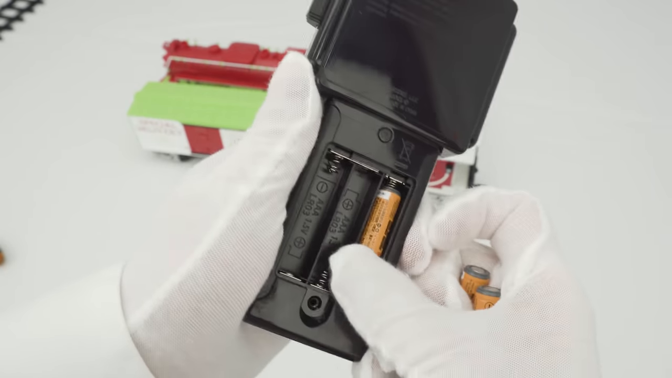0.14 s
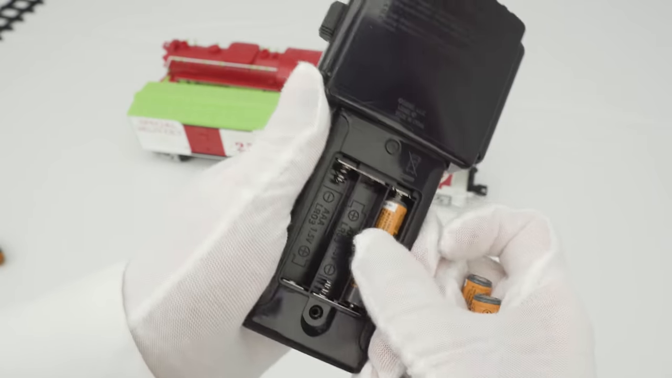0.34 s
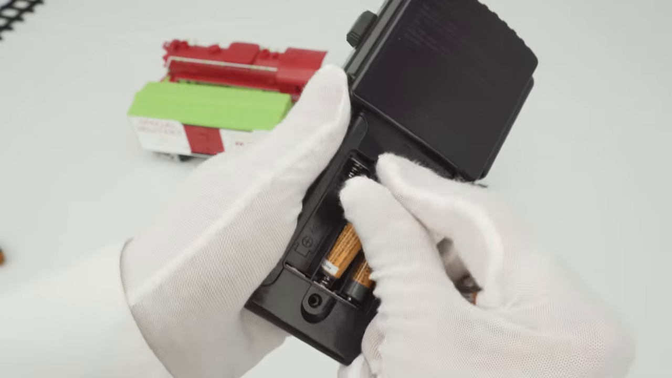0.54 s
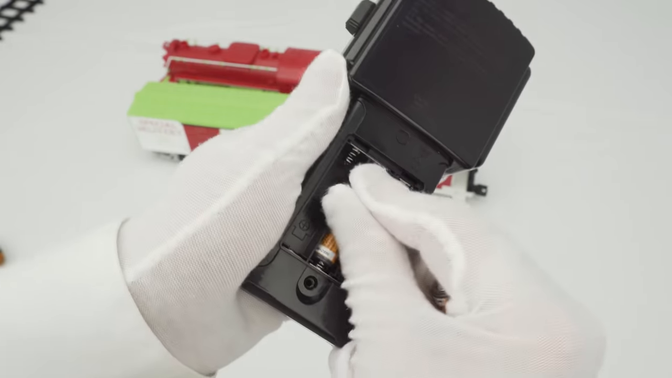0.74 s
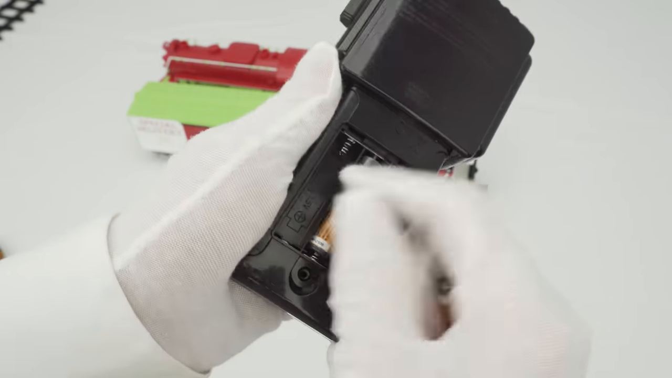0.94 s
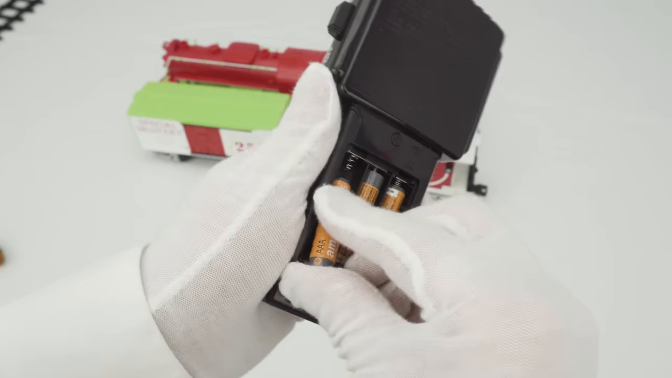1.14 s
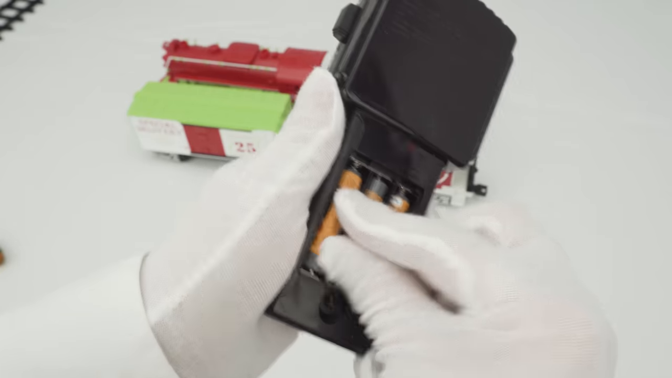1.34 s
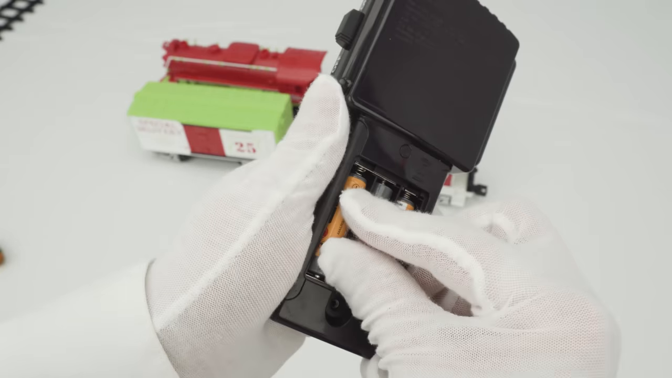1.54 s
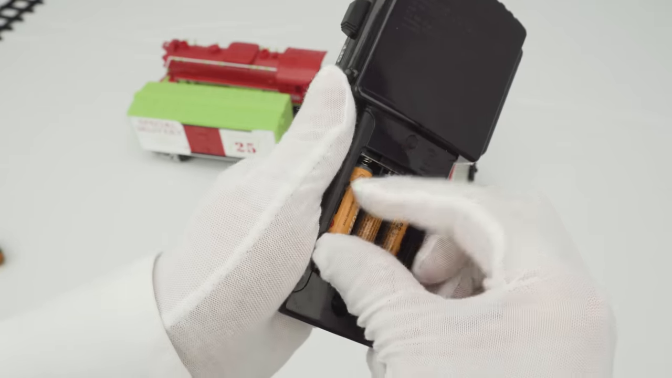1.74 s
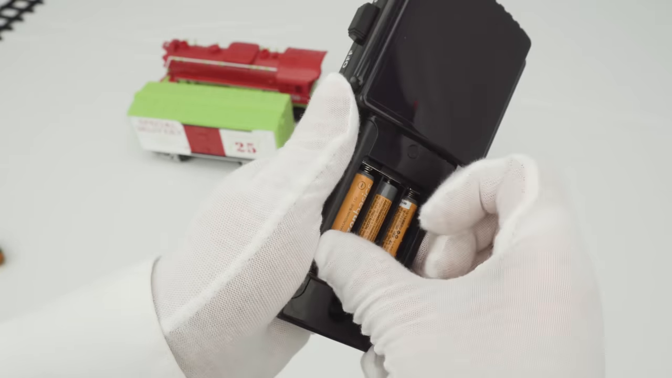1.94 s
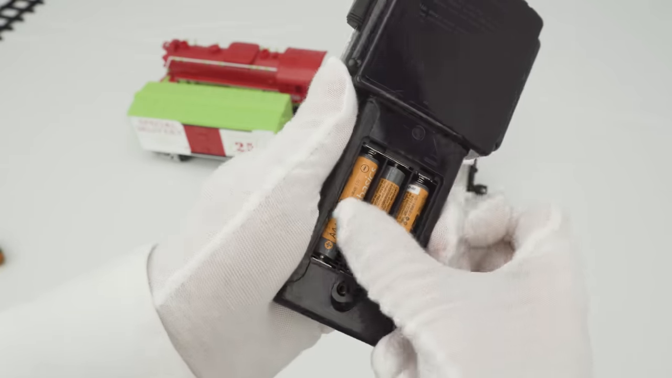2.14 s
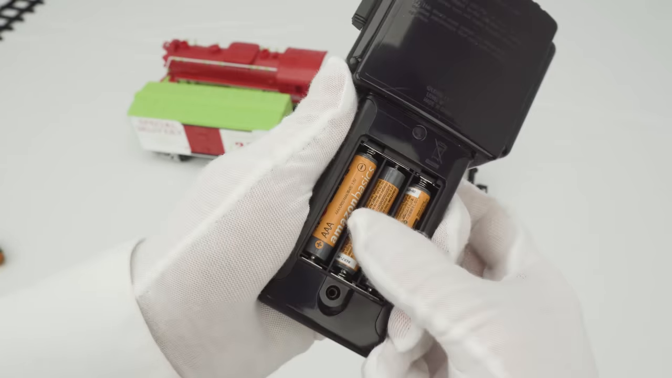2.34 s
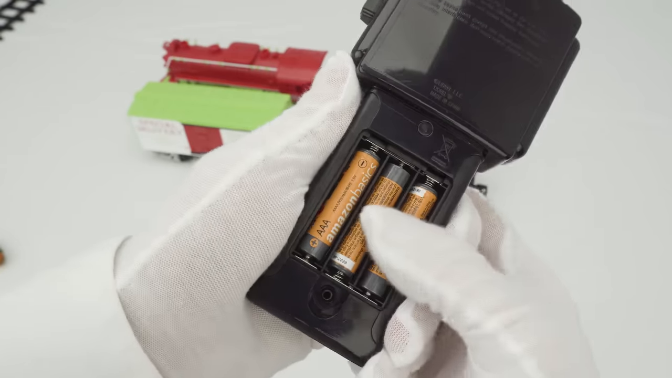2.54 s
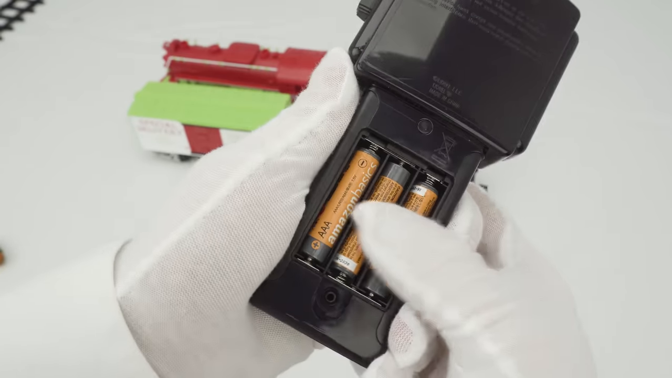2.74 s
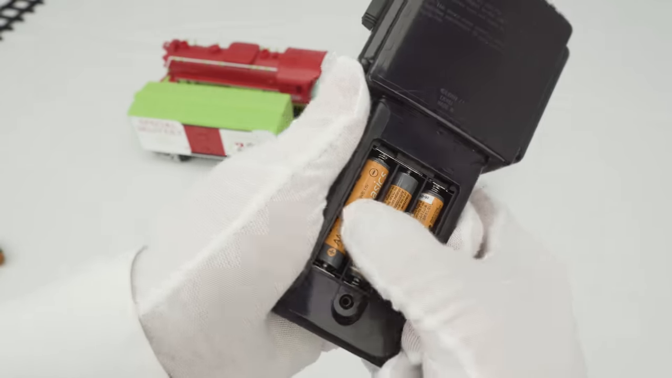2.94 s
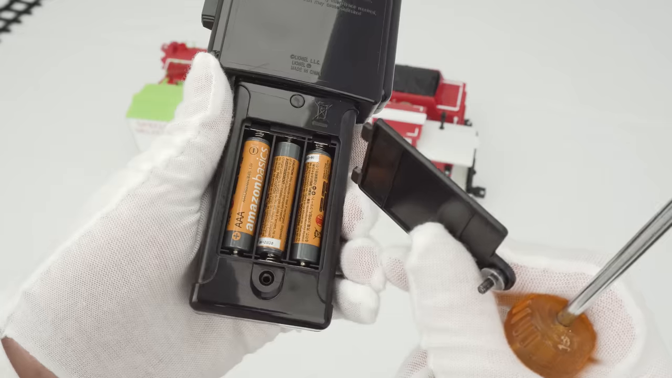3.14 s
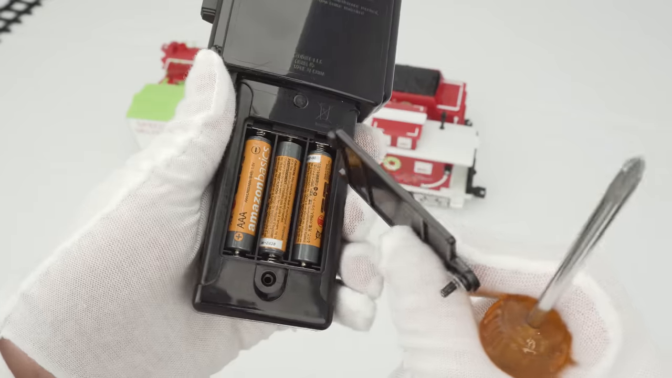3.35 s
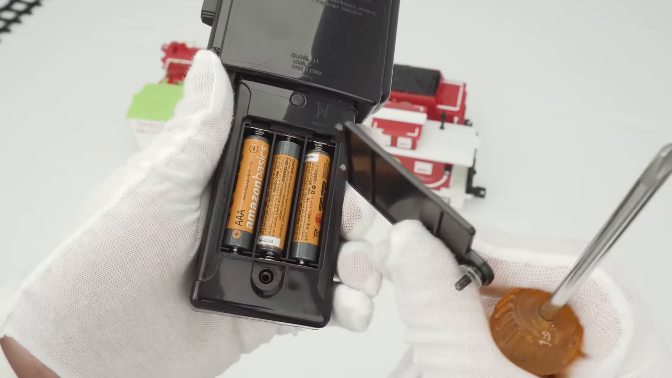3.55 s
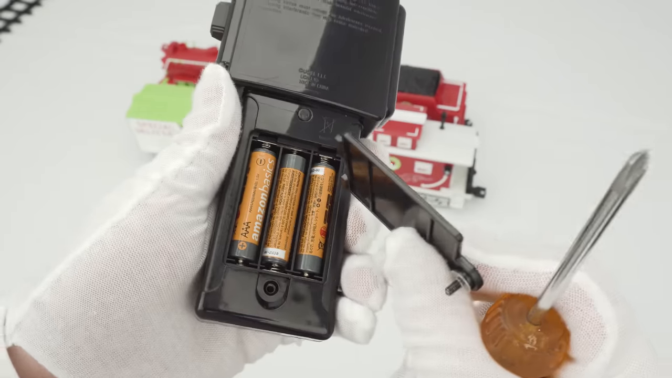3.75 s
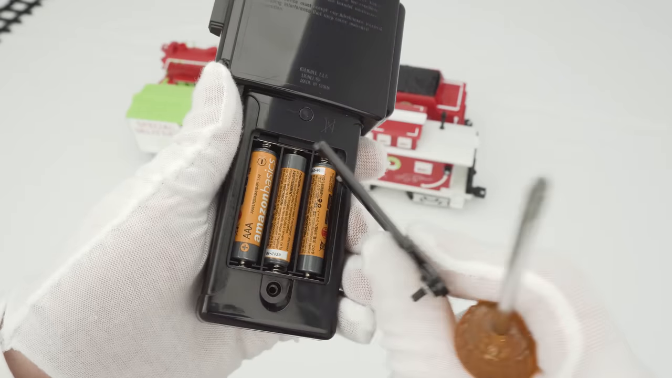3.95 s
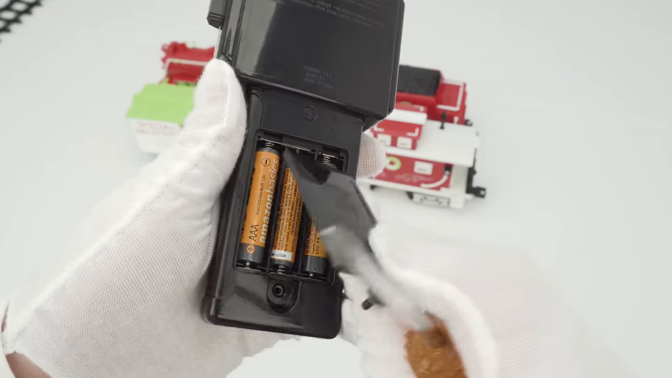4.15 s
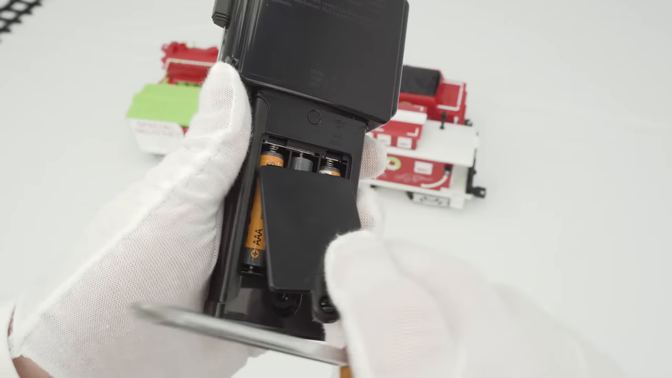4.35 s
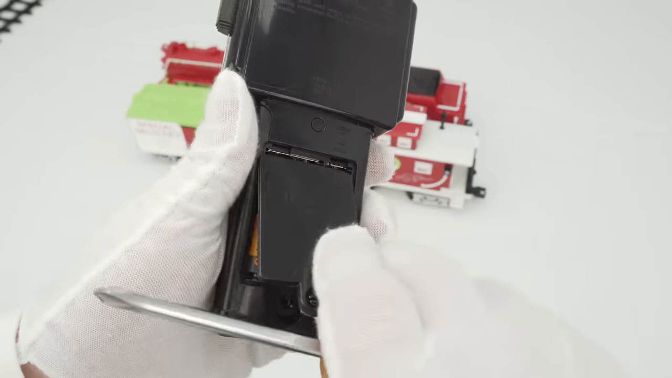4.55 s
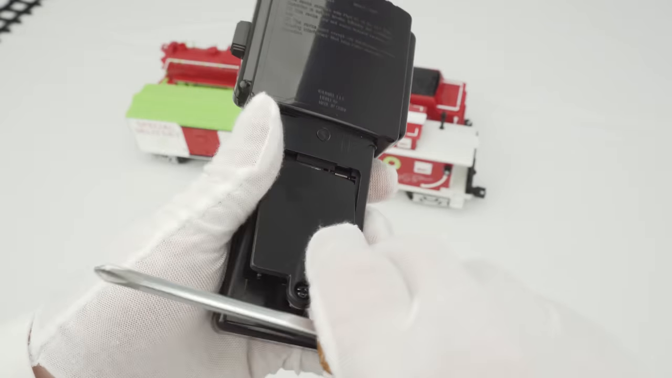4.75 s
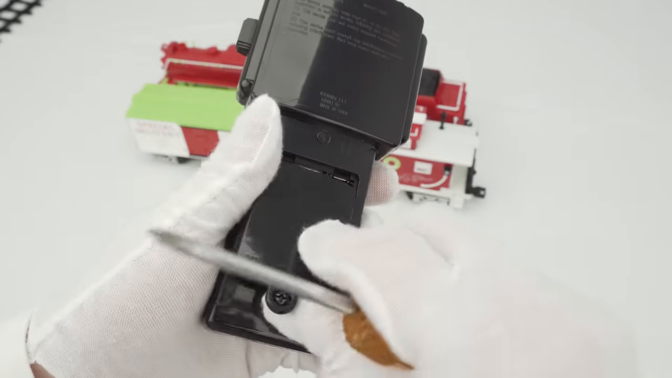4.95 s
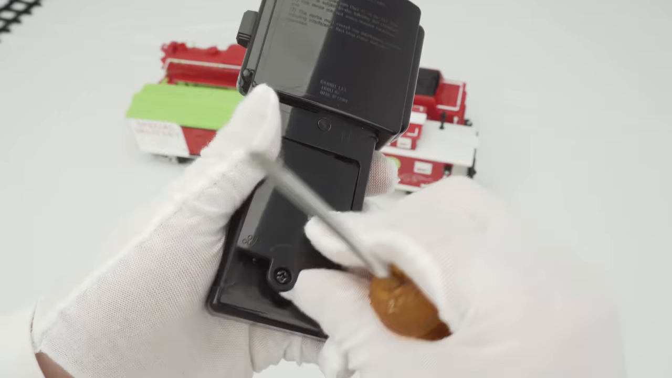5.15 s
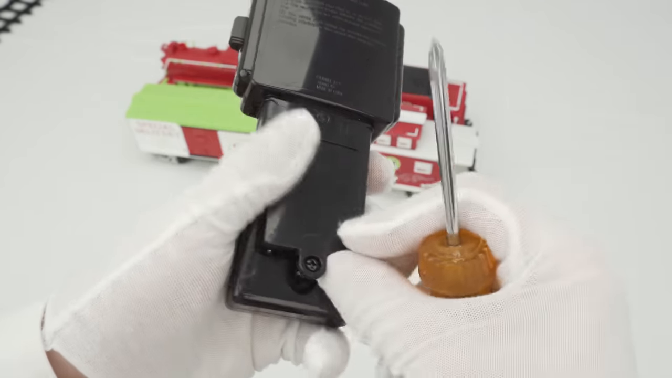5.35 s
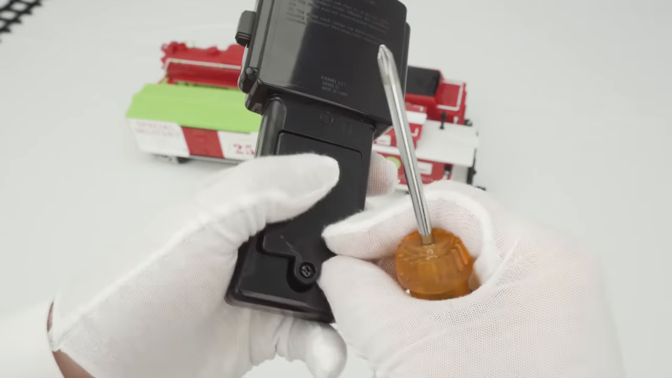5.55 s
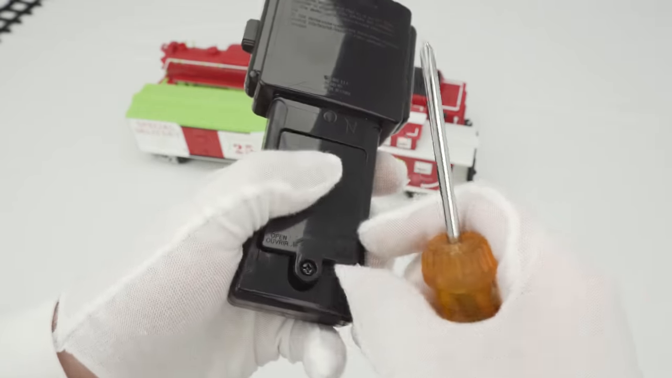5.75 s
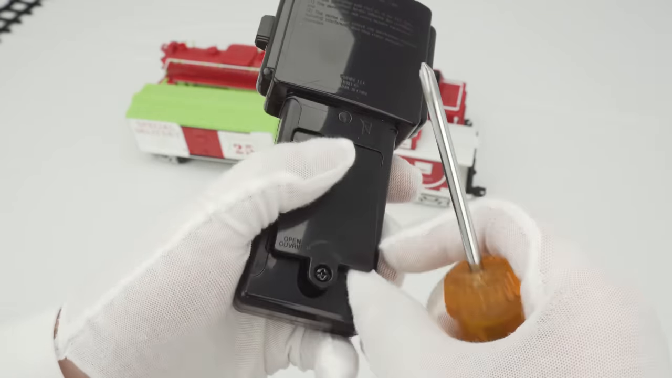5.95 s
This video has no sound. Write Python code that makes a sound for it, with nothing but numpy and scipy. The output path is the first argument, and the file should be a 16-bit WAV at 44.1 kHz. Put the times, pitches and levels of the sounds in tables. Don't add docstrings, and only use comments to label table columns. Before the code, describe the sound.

A camera microphone very near the hands catches a brief glove rub, then hard plastic and spring snaps as three battery cells are seated, each with a short room reflection. Cells are rolled with gritty cotton rubs and tiny ticks. Later a cover scrapes lightly, clicks shut with two firm snaps, and is stroked. Faint traffic rumble and a fluctuating hiss lie behind.

```python
import sys
import numpy as np
from scipy import signal
from scipy.fft import rfft, irfft, next_fast_len
from scipy.io import wavfile
from scipy.ndimage import map_coordinates

SR = 44100
rng = np.random.default_rng(int(sys.argv[2]) if len(sys.argv) > 2 else 0)


def how_loud(loudness_db):
    steps = np.asarray(loudness_db, float) / 20
    return 10 ** steps


def pcm_store(signal):
    levels = np.round(np.clip(np.atleast_2d(signal), -1, 1) * 32767)
    wavfile.write(sys.argv[1], SR, levels.astype(np.int16).T)


N = 264600
STEADY_TOP_HZ = 15950


def unit(x):
    return x / np.sqrt(np.mean(x ** 2) + 1e-20)


def top(x):
    return x / np.abs(x).max()


def along(points, hz):
    f, v = np.transpose(points)
    return np.interp(np.log(hz + 1), np.log(f + 1), v)


def curves(rows):
    s, *cols = np.transpose(rows)
    return [np.interp(np.arange(N) / SR, s, c) for c in cols]


def wobble(rate):
    return map_coordinates(rng.standard_normal(int(N * rate / SR) + 4), [np.arange(N) * rate / SR])


def swells(rows):
    t = np.arange(0, N + 32, 32) / SR
    gain = np.zeros(len(t))
    for s, db, rise, fall in rows:
        away = np.where(t < s, (s - t) / abs(rise), (t - s) / abs(fall))
        gain += how_loud(db - 20 * away ** 1.6)
    return np.interp(np.arange(N) / SR, t, gain)


def filtered(x, response):
    m = next_fast_len(x.shape[-1] + 4096)
    return irfft(rfft(x, m) * response(np.fft.rfftfreq(m, 1 / SR)), m)[..., :x.shape[-1]]


def modes(table):
    def response(f):
        return sum((-1) ** k * how_loud(db) * 1j * f * w / (c * c - f * f + 1j * f * w)
                   for k, (c, w, db) in enumerate(table))
    return response


def pair(two, alike):
    def mid_side(hz):
        turn = np.arccos(np.clip(along(alike, hz), -1, 1)) / 2
        return np.array([np.cos(turn), np.sin(turn)])
    mid, side = filtered(two, mid_side)
    return np.array([mid + side, mid - side])


def panned(db):
    return how_loud([[db / 2], [-db / 2]])


def add(out, s, x):
    i = round(s * SR)
    out[:, i:i + x.shape[1]] += x[:, :N - i]


# (frequency [Hz], likeness)
BACKGROUND_ALIKE = [(60, 0.92), (180, 0.83), (550, -0.19), (1650, -0.22), (4970, 0.25), (15000, 0.14)]
BASS_ALIKE = [(25, .98), (60, .94), (125, .86), (250, .86), (500, .4)]


def rush(spectrum, alike):
    noise = pair(rng.standard_normal((2, N)), alike)
    return unit(filtered(noise, lambda hz: how_loud(along(spectrum, hz))))


# (time [s], frequency [Hz], level [dB])
MOTOR_LOW = [(0, 151.2, -56), (.4, 144, -57), (.5, 123.4, -56), (.66, 121, -59), (.7, 118, -91)]
MOTOR_HIGH = [(0, 216, -60.5), (.22, 231.7, -55), (.3, 220, -61), (.4, 221, -89.5)]


def distant_motor():
    out = np.zeros(N)
    for rows in (MOTOR_LOW, MOTOR_HIGH):
        hz, db = curves(rows)
        level = how_loud(db + 2.5 + 3.5 * wobble(9.3))
        out += level * np.sin(2 * np.pi * np.cumsum(hz * (1 + 0.013 * wobble(30))) / SR)
    return out


# (frequency [Hz], level [dB per Hz])
RUMBLE_SPECTRUM = [(15, -35.5), (25, -10), (40, 0), (120, 2), (170, -0.5), (230, -31)]
MURMUR_SPECTRUM = [(130, -37.5), (190, -3), (280, -0.5), (420, -10.5), (700, -20), (1200, -35)]
# (time [s], level [dB], build-up [s], let-go [s])
DEEP_SWELLS = [(.15, -61.5, 0.56, 0.25), (.53, -63, 0.45, .3), (1.05, -61, 0.16, .3), (1.85, -64, .5, 0.7),
               (2.99, -64, .9, 1), (4.56, -66.5, 0.78, 0.53), (5.16, -70, .4, 0.34), (5.7, -63, 0.46, 1)]
HIGH_SWELLS = [(.02, -61.5, .3, 0.25), (.27, -59, .3, 0.76), (1.22, -66, .6, 0.89), (2.07, -56, .25, 0.51),
               (2.99, -67, .9, 1.2), (4.4, -68, .6, 0.81), (5.33, -58.5, .4, 1)]


def distant_traffic():
    rumble = (how_loud(-73) + swells(DEEP_SWELLS)) * how_loud(0.91 * wobble(12)) * rush(RUMBLE_SPECTRUM, BASS_ALIKE)
    murmur = (how_loud(-73.5) + swells(HIGH_SWELLS)) * how_loud(0.73 * wobble(10)) * rush(MURMUR_SPECTRUM, BASS_ALIKE)
    return rumble + murmur


# (frequency [Hz], level [dB per Hz])
AIR_SPECTRUM = [(180, -37.5), (300, -13.5), (470, -9), (1200, -11), (1600, -15), (3800, -18.5), (8000, -23),
                (12000, -24.5), (15800, -30), (16100, -60)]
MIC_SPECTRUM = [(1000, -28.5), (4000, -10.5), (9000, -5.5), (13500, 5), (15750, 8), (16000, -40.5)]
# (time [s], level [dB])
CAMERA_GAIN = [(0, 4.5), (.25, 0), (.6, 3.5), (.85, 7.5), (1.05, 1.5), (1.3, 0), (1.85, -1.5), (2.1, 2.5),
               (2.5, -1.5), (3.0, -2.5), (3.9, -4), (4.4, -1), (4.9, 0.5), (5.3, 6.5), (5.55, 0), (6, 0)]


def hiss():
    gain_db, = curves(CAMERA_GAIN)
    air = how_loud(-59 + gain_db) * rush(AIR_SPECTRUM, BACKGROUND_ALIKE)
    return air + how_loud(-73 + .15 * gain_db) * rush(MIC_SPECTRUM, BACKGROUND_ALIKE)


# (frequency [Hz], level [dB per Hz])
COTTON_FIZZ = [(5000, -14.5), (7500, 0), (9800, 2.5), (11500, 0.5), (14500, 3.5), (16000, -4)]


def rub(strokes, ring, grit_db, pan_db, fizz_db):
    grit = how_loud(grit_db * wobble(300) + 1.5 * wobble(40)) * pair(rng.standard_normal((2, N)), [(1000, .85)])
    body = unit(filtered(grit, lambda f: modes(ring)(f) * modes([(3430, 6500, 0)])(f)))
    fizz = unit(filtered(grit, lambda hz: how_loud(along(COTTON_FIZZ, hz))))
    press = swells(strokes)
    share = how_loud(-11.5 + fizz_db) * np.clip(press / how_loud(-55), .1, None) ** -0.1
    return press * (body + share * fizz) * panned(pan_db)


# (time of most pressure [s], level [dB], build-up [s], let-go [s])
PUSH_STROKES = [
    (.07, -54.5, .08, .05),
    (.12, -39.5, 0.055, .05),
    (.155, -39, .04, 0.023),
    (.19, -52.5, .04, .05),
    (1.07, -51.5, 0.022, .04),
]
# (frequency [Hz], width [Hz], level [dB])
PUSHED_SURFACE = [(2610, 400, -4.5), (3620, 300, -3), (4050, 296, -5.5), (5250, 130, 1), (5720, 170, -8.5)]


def glove_pushes():
    return rub(PUSH_STROKES, PUSHED_SURFACE, grit_db=2.5, pan_db=.6, fizz_db=-1)


# (frequency [Hz], t60 [s])
ROOM_DECAY = [(300, 0.24), (1000, 0.31), (3000, 0.26), (7000, .22), (15000, 0.2)]
# (frequency [Hz], level [dB])
ROOM_COLOR = [(200, -11.5), (500, 0.5), (2000, -6), (6000, 3), (15000, -7)]
# (frequency [Hz], likeness)
ROOM_SPREAD = [(300, 1), (1400, .66), (3100, .53), (15000, .34)]


def room(x, duck_db, recover):
    hz, t, z = signal.stft(rng.standard_normal((2, SR // 3)), SR, nperseg=256)
    color_db = along(ROOM_COLOR, hz) - 60 * (hz > STEADY_TOP_HZ)
    decay_db = 60 * t / along(ROOM_DECAY, hz)[:, None]
    shape_db = color_db[:, None] - decay_db - duck_db * np.exp(-t / recover)
    tail = pair(signal.istft(z * how_loud(shape_db), SR, nperseg=256)[1], ROOM_SPREAD)
    n = np.arange(tail.shape[1])
    tail = tail * np.clip(n / SR / 0.0035, 0, 1)
    lumps = map_coordinates(rng.standard_normal(64), [n * 130 / SR])
    tail = tail * how_loud(2.4 * lumps)
    return signal.fftconvolve(x[None], tail / np.linalg.norm(tail[0]), axes=1)


def left_leads(f):
    delay = 1.8e-5 / (1 + (f / 7000) ** 2)
    return np.exp(-2j * np.pi * f * delay * np.array([[0], [1]]))


# (frequency [Hz], width [Hz], level [dB])
CASE_WALLS = [(1763, 300, -0.5), (2252, 210, 4.5), (2796, 420, 4), (3360, 570, 6.5), (4100, 1300, 4),
              (5570, 350, -6.5), (1350, 100, -5.5)]
# (frequency [Hz], width [Hz], level [dB])
BAY_AIR = [(560, 93, -11), (878, 70, 6.5), (1125, 307, -1.5)]


def contact(out, s, force, spot_hz, db, knock_db, crack_db, room_db, pan_db, wash_db, dull_db):
    struck = []
    for (hz, w, level), chance in zip(CASE_WALLS, rng.normal(0, 1.8, len(CASE_WALLS))):
        octaves = np.log2(hz / spot_hz)
        struck.append((hz, w, level + chance - 3.5 * abs(octaves) - dull_db * max(0, octaves)))
    spot = modes([(spot_hz, .17 * spot_hz, 5)])
    walls = top(filtered(force, lambda f: modes(struck)(f) * (1 + spot(f))))
    knock = how_loud(knock_db) * top(filtered(force, modes(BAY_AIR)))
    crack = how_loud(crack_db) * top(filtered(force, modes([(7100, 18000, -0.19), (13700, 23000, 1.5)])))
    near = panned(pan_db) * knock + panned(pan_db / 1.5) * walls + panned(.6) * crack
    add(out, s, how_loud(db) * filtered(near, left_leads))
    click = 1. * (np.arange(2048) == 0)
    wash = filtered(click, modes([(1370, 1100, 11.5), (3000, 2970, 2.5)]))
    wash -= filtered(click, modes([(3100, 170, -3), (5230, 1100, -17.5)]))
    wash += how_loud(crack_db - 3.5) * filtered(click, modes([(10300, 6700, 0.0029)]))
    bay = filtered(click, modes([(910, 150, 0.5), (1238, 350, 1.41)]))
    broad = how_loud(wash_db) * top(wash) + how_loud(-9 - 0.33 * knock_db) * walls + how_loud(knock_db - 0.5) * top(bay)
    answer = room(broad / np.linalg.norm(broad), duck_db=16.5, recover=0.078)
    add(out, s, how_loud(db + room_db + 11.0) * panned(-1.2) * answer)


def snaps(table, pan_db, blow, wash_db, knock_db, dull_db):
    out, t = np.zeros((2, N)), np.arange(2048) / SR
    for s, db, hz, crack_db, room_db in table:
        force = (t == 0) + 0.22 * rng.standard_normal(len(t)) * how_loud(-60 * t / blow)
        contact(out, s, force, hz, db, knock_db, crack_db, room_db, pan_db, wash_db, dull_db)
    return out


def skids(table, knock_db):
    out, t = np.zeros((2, N)), np.arange(2048) / SR
    for s, db, length, crack_db, room_db in table:
        push = np.sin(np.pi * np.clip(t / length, 0, 1)) ** .5 * (t < length)
        force = rng.standard_normal(len(t)) ** 3 * push
        contact(out, s, force, 1900, db, knock_db, crack_db, room_db, pan_db=-3.5, wash_db=-6.0, dull_db=2.0)
    return out


# (time [s], peak [dB], ring [Hz], crack [dB], room [dB])
CELL_SNAPS = [(0.247, -38, 3100, -33, 8), (0.2635, -23.5, 2250, -8, 8), (0.5904, -32.5, 1790, -20.5, -5.5),
              (0.6369, -9, 1800, -26, -7.5), (0.7435, -8, 1850, -9.5, -3), (0.7442, -12.5, 4655, -10.5, -2),
              (1.2043, -26, 5470, 3, -8.5), (1.2165, -20.5, 2960, -24, -15), (1.3943, -5, 1870, -17, -18),
              (1.403, -14.5, 1890, -19.5, -14.5), (1.4065, -9, 1755, -35, -9.5),
              (1.8743, -14, 1610, -10, -10.5)]


def cell_snaps():
    return snaps(CELL_SNAPS, pan_db=-3.0, blow=0.0079, wash_db=0.5, knock_db=-11.5, dull_db=2.5)


# (time [s], peak [dB], ring [Hz], crack [dB], room [dB])
SPRING_SNAPS = [
    (0.2685, -6.5, 2560, -17.5, -1),
    (0.6388, -10.5, 2937, -28, -5),
    (0.685, -7, 3350, -48.5, -5),
    (1.2093, -8, 1760, -13.5, -1),
    (1.4123, -10, 1590, -11, 4),
    (1.4367, -10, 1850, -10.5, -13),
    (1.7778, -13, 1846, -2.5, -11.5),
    (1.7875, -26, 3300, 0, 6),
    (1.8915, -18, 4240, 1, -14),
    (1.9, -33, 8000, -2, -14),
]


def spring_snaps():
    return snaps(SPRING_SNAPS, pan_db=-4.5, blow=0.0061, wash_db=4.0, knock_db=-20, dull_db=3)


# (time [s], peak [dB], frequency [Hz])
PALM_JOLTS = [
    (0.27, -46, 260),
    (0.636, -29, 420),
    (0.678, -44.5, 120),
    (1.205, -39.5, 255),
    (1.872, -38.5, 131),
    (2.197, -46.5, 229),
    (5.135, -30.5, 560),
]


def thumps():
    out, t = np.zeros((2, N)), np.arange(4096) / SR
    for s, db, hz in PALM_JOLTS:
        add(out, s, how_loud(db - 60 * t * hz / 7.0) * np.sin(2 * np.pi * hz * t) * np.ones((2, 1)))
    return out


# (time [s], peak [dB], length [s], crack [dB], room [dB])
CELL_SLIPS = [
    (0.449, -48, .008, 6, -12.5),
    (0.629, -37.5, 0.0045, -12.5, -11),
    (0.67, -26, 0.012, -4, -21),
    (1.3945, -10.5, .022, -18, -8),
    (1.868, -16.5, 0.0072, -20.5, -6.5),
    (1.887, -32, 0.005, 9, -26),
    (4.894, -35, 0.0067, 10, -8),
]


def cell_slips():
    return skids(CELL_SLIPS, knock_db=-2.5)


# (time [s], peak [dB], ring [Hz], crack [dB])
ROLL_TICKS = [
    (2.1266, -43, 1880, 4.5),
    (2.178, -42.5, 3750, -14),
    (2.515, -48.5, 7000, 8),
    (2.573, -42, 4160, -19),
    (2.649, -39.5, 4600, -14),
    (2.99, -39.5, 5260, 2.5),
    (3.026, -46.5, 5770, 4),
    (3.042, -43, 4540, -16),
]


def roll_ticks():
    ticks = [(*row, -16) for row in ROLL_TICKS]
    return snaps(ticks, pan_db=-4.0, blow=0.0025, wash_db=-2.2, knock_db=-21, dull_db=10.0)


# (time of most pressure [s], level [dB], build-up [s], let-go [s])
ROLL_STROKES = [
    (2.2, -60, .06, 0.088),
    (2.29, -46, .06, 0.058),
    (2.4, -52.5, .2, .035),
    (2.58, -68, .05, 0.033),
    (2.69, -54, .2, 0.045),
    (2.872, -37.5, 0.035, 0.04),
    (3.06, -65, .3, 0.031),
]
# (frequency [Hz], width [Hz], level [dB])
ROLLED_SURFACE = [(898, 145, -9), (2590, 920, -17), (4010, 270, 0.5), (5650, 650, -4.5)]


def thumb_rolls():
    return rub(ROLL_STROKES, ROLLED_SURFACE, grit_db=1.88, pan_db=-0.63, fizz_db=1.2)


# (time [s], peak [dB], ring [Hz], crack [dB], room [dB])
LID_KNOCKS = [(4.138, -28, 3000, -42, -7), (4.353, -26, 3380, -2, -8), (4.4546, -32.5, 2260, -33, 2),
              (4.4932, -35, 2200, -9, -6), (4.5111, -40, 3900, -12, -16), (4.575, -42, 2900, -29, 8),
              (4.899, -18, 1870, -19.5, -8.5), (5.1734, -37, 1350, -13, -10), (5.1977, -34, 2630, -27, 4),
              (5.2175, -15.5, 2180, -43, -8), (5.7853, -44, 2270, 2, -25)]


def lid_knocks():
    return snaps(LID_KNOCKS, pan_db=-1.5, blow=0.0087, wash_db=-15.0, knock_db=-7, dull_db=10.5)


# (time of most pressure [s], level [dB], build-up [s], let-go [s])
SEAT_STROKES = [
    (4.37, -65, 0.27, 0.039),
    (4.51, -55.5, 0.022, .07),
    (4.6, -64.5, 0.058, 0.064),
    (4.76, -61, .12, 0.025),
    (4.875, -59.5, 0.049, 0.06),
    (5.125, -55.5, 0.11, .2),
    (5.33, -56.5, 0.04, .3),
    (5.53, -54.5, 0.15, .03),
    (5.79, -59.5, .05, .07),
]
# (frequency [Hz], width [Hz], level [dB])
LID_SURFACE = [(845, 65, 0.5), (2240, 260, -0.5), (3000, 300, -8), (4150, 490, -3.5)]


def lid_strokes():
    return rub(SEAT_STROKES, LID_SURFACE, grit_db=0.91, pan_db=-0.069, fizz_db=5.0)


# (time [s], peak [dB], length [s], crack [dB], room [dB])
LID_DRAGS = [
    (4.571, -44, 0.035, -3, -12),
    (4.47, -52, 0.019, -17, -8),
]


def lid_drags():
    return skids(LID_DRAGS, knock_db=10.5)


# (time [s], peak [dB], ring [Hz], crack [dB], room [dB])
TAB_SNAPS = [
    (4.8978, -12.5, 2660, -6.5, -5.5),
    (4.9, -12, 2440, -29, -5),
    (5.1331, -12, 3100, 0, -13.5),
    (5.134, -25, 5140, -1, -9),
    (5.2767, -58, 2150, -18, 1),
    (5.3278, -38.5, 2480, -37, -2),
    (5.408, -49, 2550, -10, -11),
    (5.521, -42, 2164, 11, -17.5),
    (5.5574, -46, 2160, 4, -8),
    (5.5781, -40.5, 1980, -6, -4),
]


def tab_snaps():
    return snaps(TAB_SNAPS, pan_db=-4.0, blow=0.012, wash_db=-1.0, knock_db=-19, dull_db=12)


def scene():
    steady = distant_motor() + distant_traffic() + hiss()
    steady = steady + glove_pushes() + thumb_rolls() + lid_strokes()
    hits = cell_snaps() + spring_snaps() + thumps() + cell_slips()
    hits += roll_ticks() + lid_knocks() + lid_drags() + tab_snaps()
    return hits + filtered(steady, lambda hz: hz < STEADY_TOP_HZ)


def band_limit(x):
    return signal.sosfilt(signal.butter(12, 17000, fs=SR, output="sos"), x)


# (frequency [Hz], level [dB])
MIC_LIMIT = [(16000, 0), (16650, -3), (16850, -40), (16950, -120)]


def record(dry):
    x = filtered(dry, lambda hz: how_loud(along(MIC_LIMIT, hz)))
    x = x / (1 + np.abs(x / .78) ** 6) ** (1 / 6)
    return band_limit(x)


dry = scene()
out = record(dry)
pcm_store(out)
```